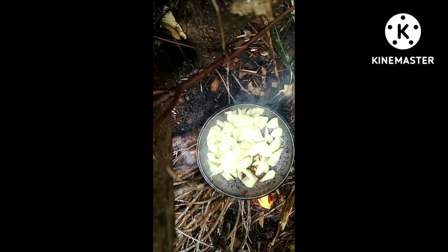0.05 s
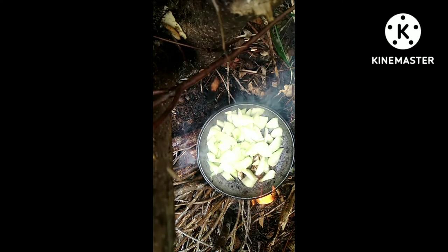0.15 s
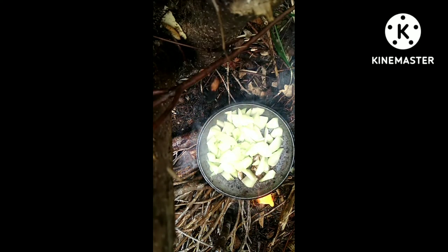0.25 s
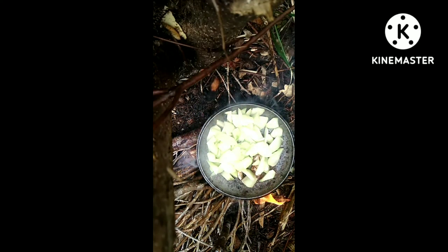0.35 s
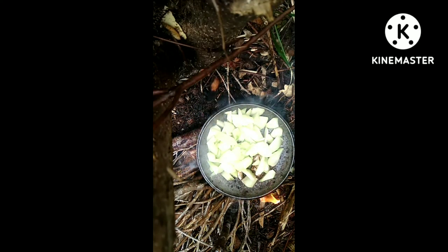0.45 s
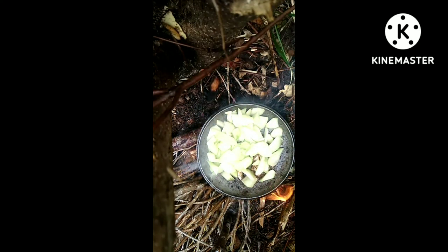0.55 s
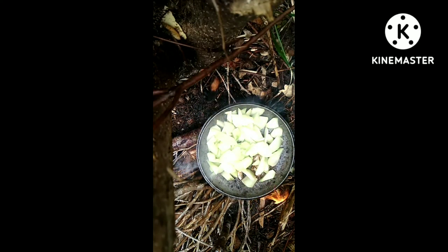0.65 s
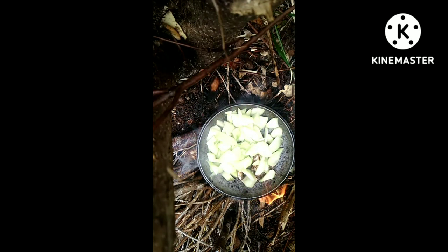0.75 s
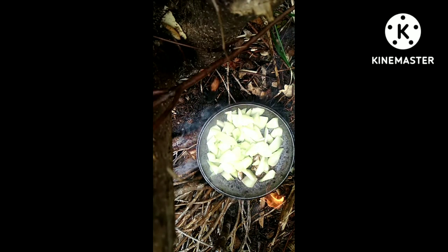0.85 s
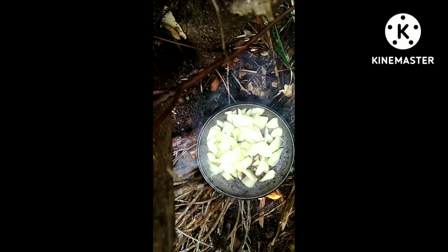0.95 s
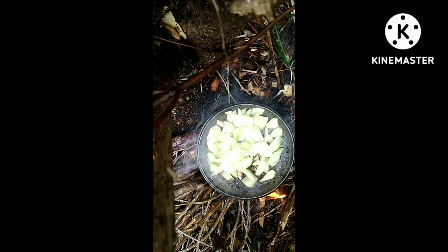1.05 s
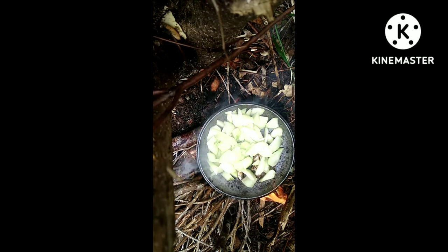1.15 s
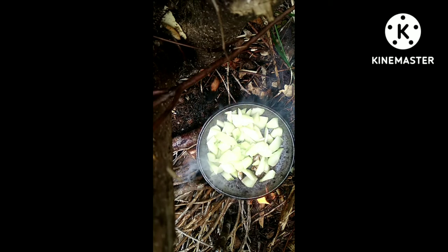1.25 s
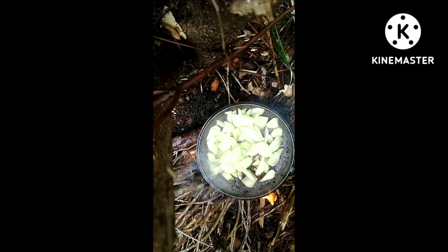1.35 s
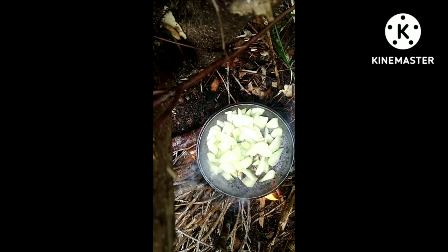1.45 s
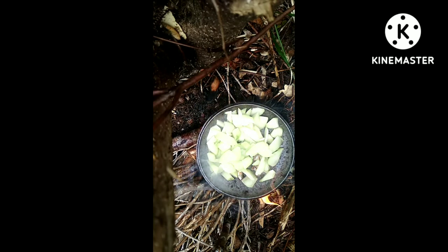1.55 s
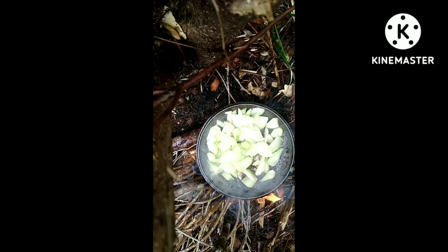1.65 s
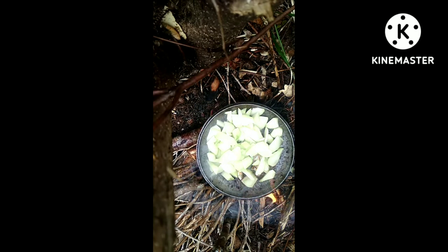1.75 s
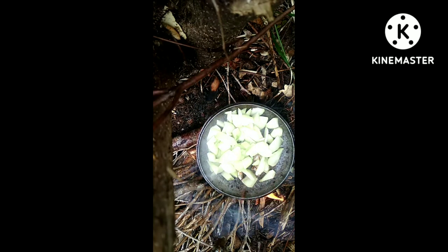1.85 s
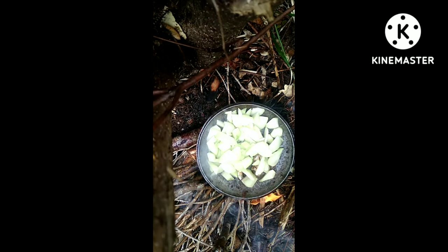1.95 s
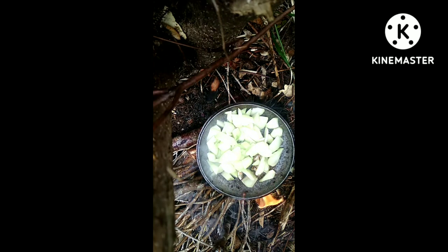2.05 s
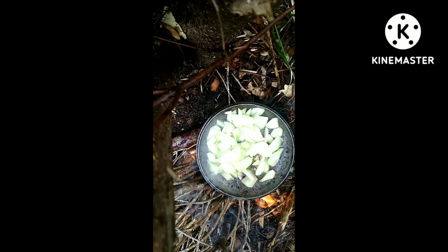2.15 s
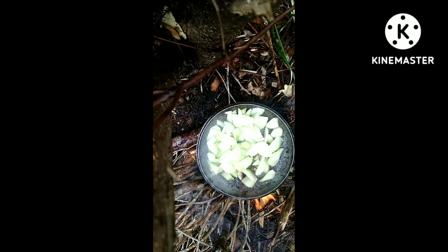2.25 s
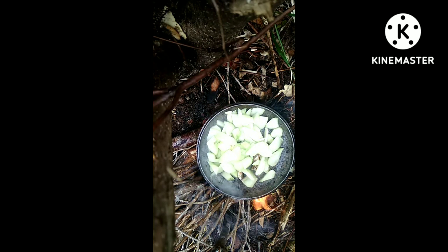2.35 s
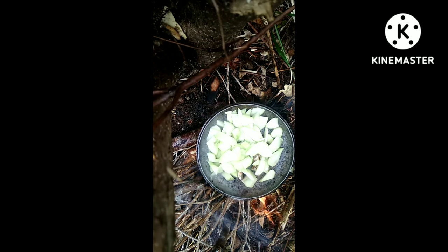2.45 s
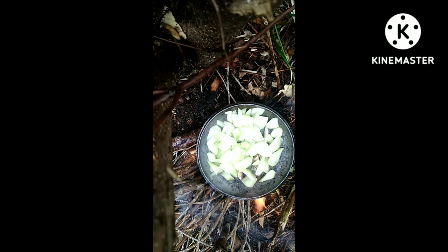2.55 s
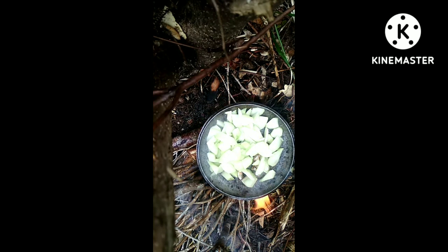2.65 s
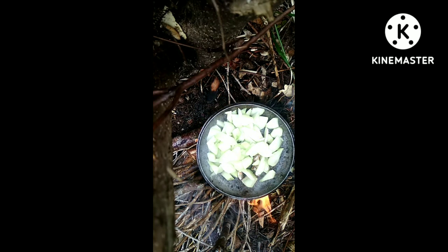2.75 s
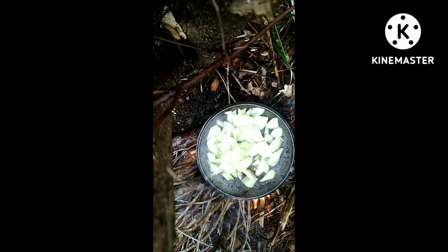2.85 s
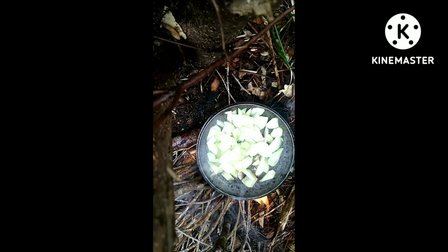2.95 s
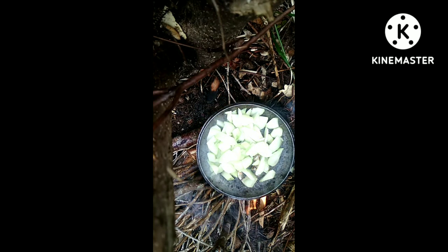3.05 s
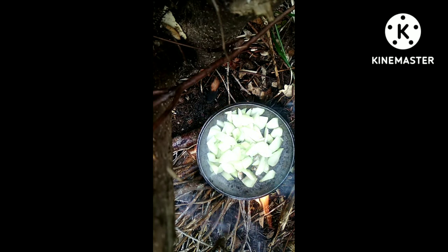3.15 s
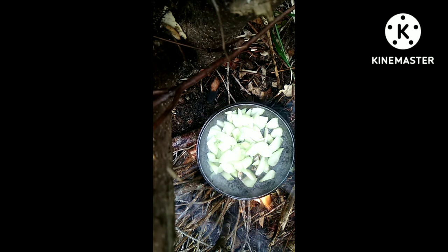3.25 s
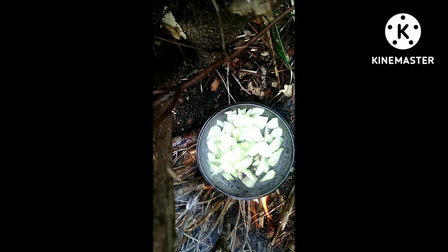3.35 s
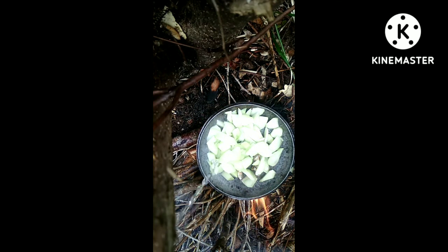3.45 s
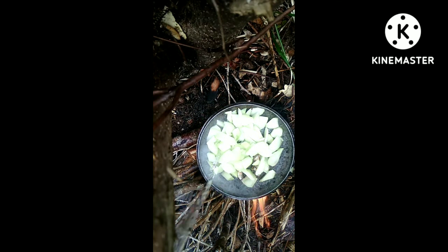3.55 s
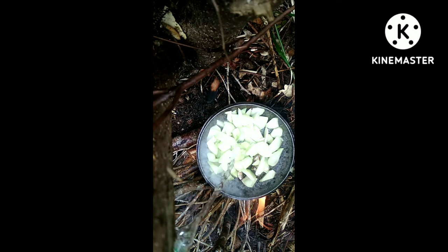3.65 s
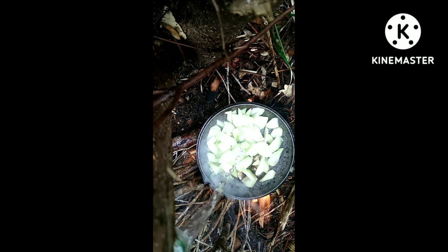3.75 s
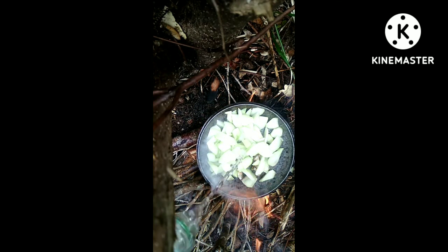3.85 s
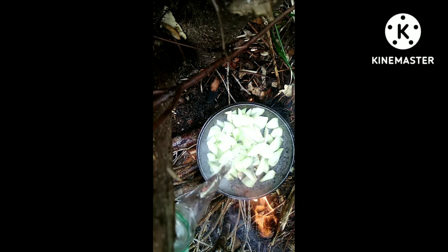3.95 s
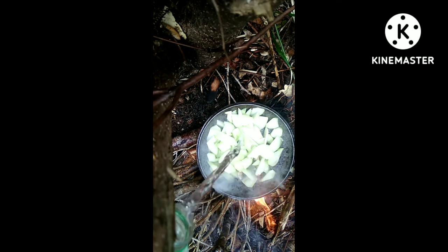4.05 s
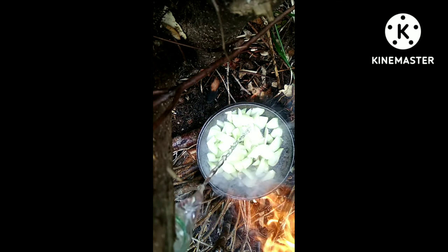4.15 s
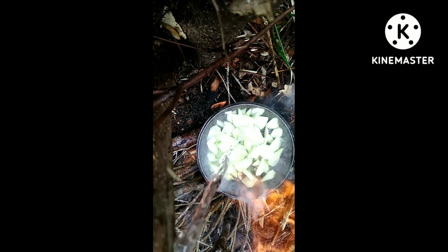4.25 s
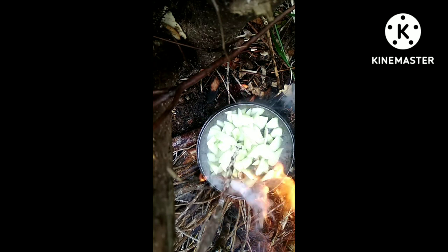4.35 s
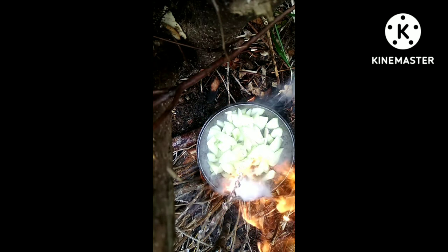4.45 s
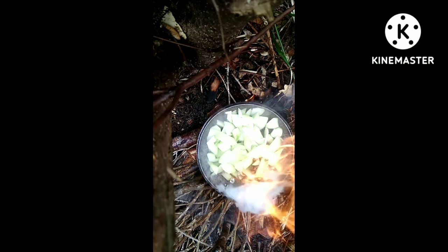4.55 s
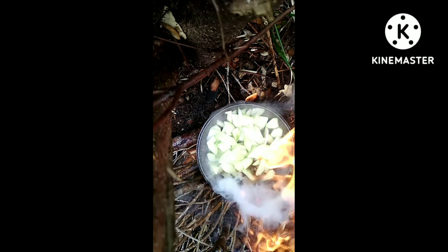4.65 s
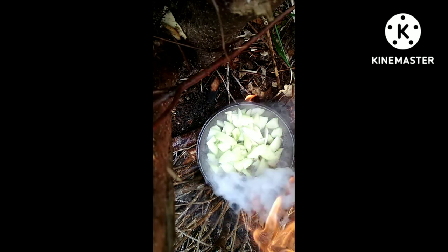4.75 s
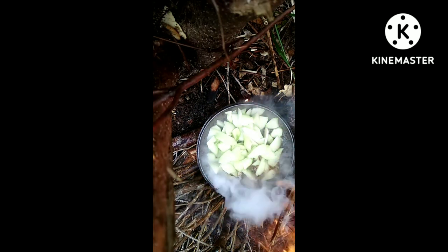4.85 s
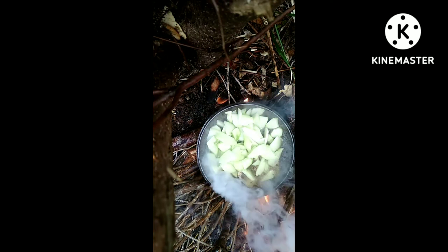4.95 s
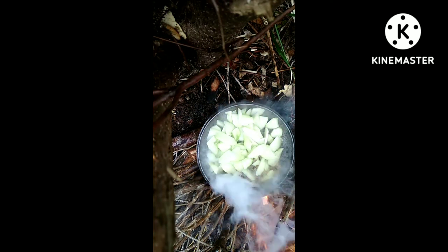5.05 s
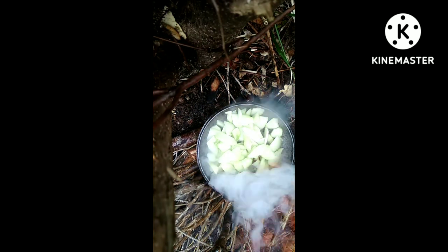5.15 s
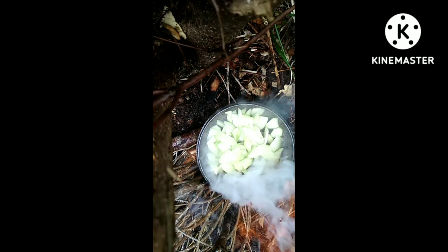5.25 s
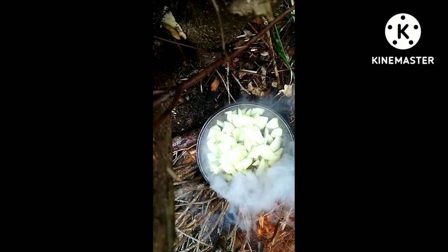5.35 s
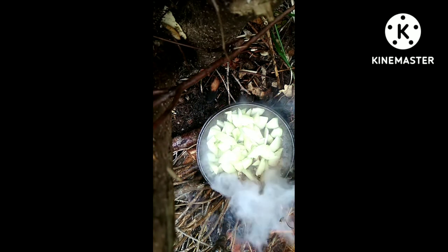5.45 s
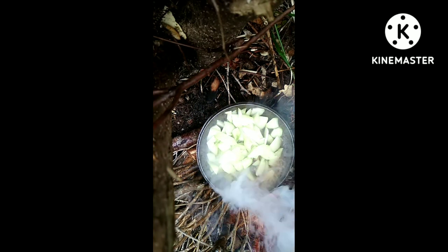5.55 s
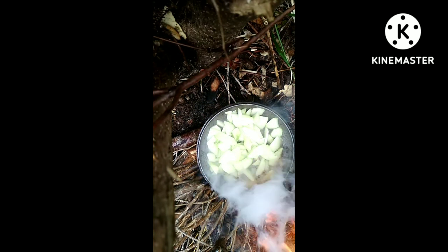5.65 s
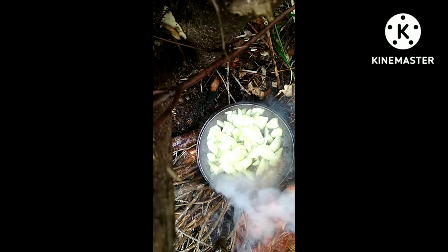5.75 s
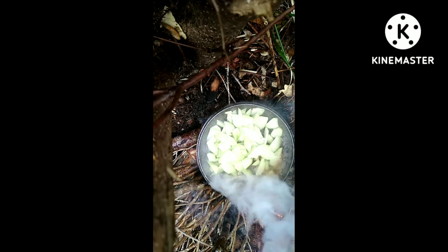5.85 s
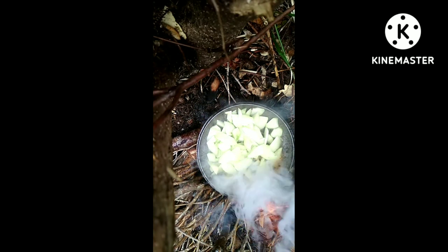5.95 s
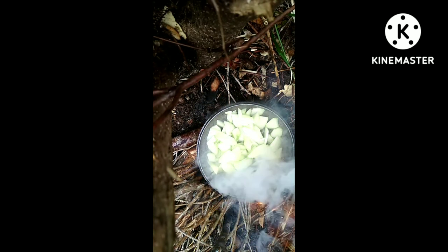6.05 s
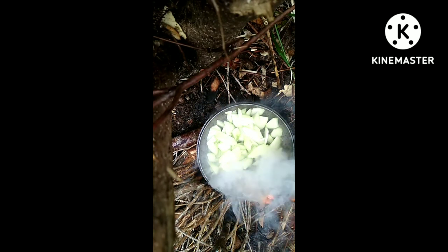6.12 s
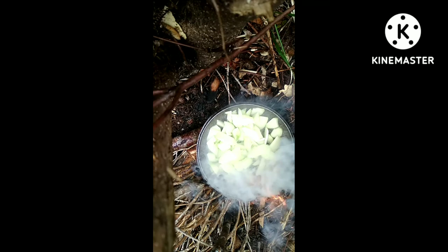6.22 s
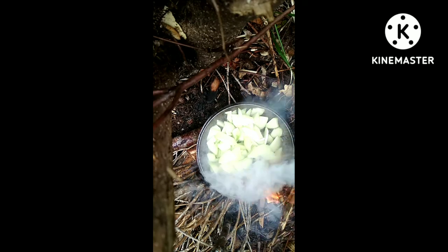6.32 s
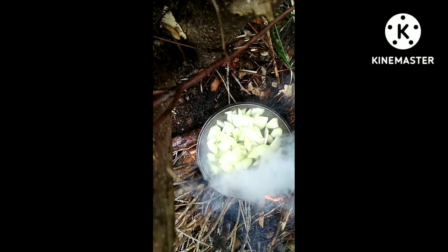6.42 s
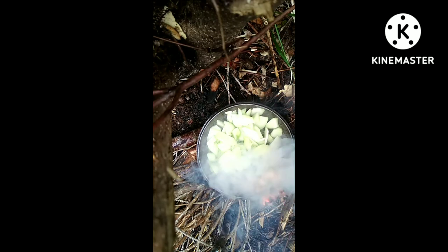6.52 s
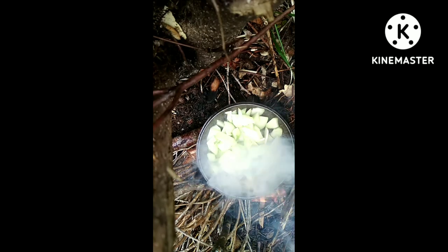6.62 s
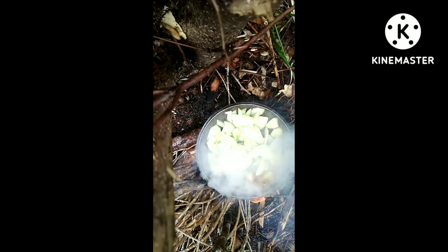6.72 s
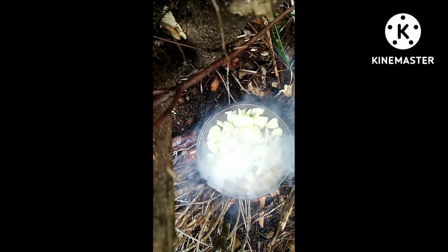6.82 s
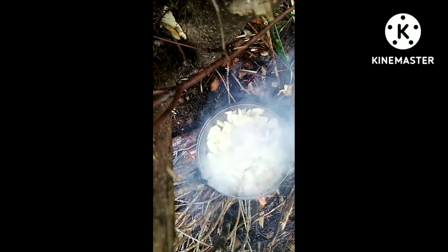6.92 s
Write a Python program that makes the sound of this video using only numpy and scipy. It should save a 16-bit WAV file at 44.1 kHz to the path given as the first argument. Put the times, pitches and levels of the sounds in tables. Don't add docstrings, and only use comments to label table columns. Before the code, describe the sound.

Outdoors, close to a pan over a twig fire, a dense bright sizzle runs throughout, fairly steady with small wavers. From 0 to 3.5 seconds fat spits in frequent sharp ticks, leaning right, over a soft simmer that slowly thickens; twigs snap drily, with clusters around 1.5 and 2.3 and a strong pop near 2.8. Faint finger rubs and casing creaks gather around 0.8 to 1.4, with slight wind buffets. A hard crack comes at 3.5 as flames begin on the right. Fuel catches around 4, swelling to a fluttering, blowing roar at about 4.5 that spreads to the centre. Heavy air flaps and a loud stick pop come near 5, more at 5.7, then scattered pops from 6.3 to 6.9 as the roar subsides, leaving sizzle. The handheld stereo sound is dry, with a slightly watery, mottled hiss.

```python
import sys
import numpy as np
from scipy import signal
from scipy.fft import rfft, irfft, dct, next_fast_len
from scipy.io import wavfile
from scipy.ndimage import uniform_filter1d

SR = 44100
rng = np.random.default_rng(int(sys.argv[2]) if len(sys.argv) > 2 else 0)


def dump(signal):
    limited = np.clip(np.atleast_2d(signal).T, -1, 1)
    pcm = np.round(limited * 32767).astype(np.int16)
    wavfile.write(sys.argv[1], SR, pcm)


def makeup_ratio(level_db):
    decades = np.asarray(level_db, float) / 20
    return 10 ** decades


N = 307811

# (time [s], level [dB])
FRYING_HEAT = [(0.0, -34.5), (0.25, -37), (0.47, -36.5), (0.62, -34.5), (0.87, -36.5), (1.59, -36),
               (2.21, -35), (3.71, -34.5), (4.33, -33.5), (6.65, -35.5), (6.98, -37.5)]
# (time [s], peak [dB], left-right [dB])
FAT_SPITS = [(0.0391, -18, -14), (0.0625, -13, -16), (0.1766, -27, 5), (0.1867, -14, -15),
             (0.2407, -19, -16), (0.2595, -17.5, -15), (0.518, -13.5, -6), (0.5492, -15.5, -20),
             (0.5668, -15, -17), (0.636, -12.5, -14), (0.6514, -17, -17), (0.6782, -13.5, -15),
             (0.7415, -26, 3), (0.7462, -21, 1), (0.7527, -25, -7), (0.7742, -19, 0), (0.8829, -21, -7),
             (0.9474, -25, -14), (0.9985, -23, -14), (1.0698, -20, -18), (1.0772, -15, -14),
             (1.0862, -12, -17), (1.1005, -21, -14), (1.1198, -20, -14), (1.1373, -18.5, -14),
             (1.1889, -17.5, -11), (1.2112, -23, -11), (1.2192, -22, -11), (1.2595, -15, -14),
             (1.33, -15, -12), (1.3575, -15.5, -15), (1.4771, -20, -13), (1.5315, -21, -6),
             (1.6917, -20, 4), (1.7188, -21, -8), (1.7288, -21.5, 0), (1.8663, -19, -3), (1.9036, -18, -16),
             (1.9232, -14, -13), (1.9812, -18, -9), (2.0272, -20, -5), (2.0854, -18, 10), (2.1095, -25, -3),
             (2.2799, -21, -7), (2.3241, -18, 1), (2.3605, -18, 0), (2.3715, -18, -14), (2.4283, -23, 12),
             (2.4424, -20, 5), (2.6026, -24, -4), (2.7921, -25, 1), (3.0619, -17, -7), (3.1125, -16, -14),
             (3.2052, -17.5, -18), (3.2263, -19, -14), (3.2547, -15, -11), (3.4189, -18, -12),
             (3.4716, -18, -13), (3.5107, -12, -4), (3.8431, -28, 2)]
# (time [s], length [s], rms level [dB], pitch [Hz], left-right [dB])
JUICE_POCKETS = [
    (0.513, 0.023, -37.5, 4870, -2),
    (1.508, 0.015, -39, 5860, -13),
    (1.622, 0.071, -36.5, 5100, -6),
    (1.687, .006, -36, 4700, -4),
    (1.709, 0.056, -39.5, 4660, -3),
    (1.904, 0.006, -32, 4600, -17),
    (1.986, 0.0044, -32.5, 4600, -4),
    (3.511, .0012, -33, 3100, -6),
    (3.5, .12, -43, 6400, -5),
    (4.93, .08, -45.5, 3780, -3.5),
]
# (time [s], level [dB])
FUEL_BURNING = [
    (3.5, -39.5),
    (3.8, -41),
    (4.05, -36.5),
    (4.3, -32.5),
    (4.5, -31.5),
    (4.95, -34.5),
    (5.25, -34),
    (6.1, -37),
    (6.98, -41.5),
]
# (time [s], length [s], rise [dB])
VAPOUR_PUFFS = [
    (3.704, .012, 4.5),
    (4.022, 0.011, 3),
    (4.087, 0.0079, 2.5),
    (4.175, 0.016, 2),
    (5.054, 0.074, 4.5),
    (5.684, 0.06, 2.5),
    (6.043, 0.022, 2.5),
    (6.348, 0.026, 3.5),
]
# (time [s], peak [dB], left-right [dB], pitch [Hz])
AIR_FLAPS = [(1.8014, -42, 18, 457), (1.9985, -40, -7, 330), (2.0105, -44, -5, 370), (2.1166, -39, -8, 312),
             (2.1434, -38, -3, 320), (2.1618, -44, -2, 260), (2.2646, -45, 14, 200),
             (2.4679, -47, -15, 170), (2.8419, -46, 3, 240), (3.0223, -44.5, 3, 300), (3.1823, -47, 4, 280),
             (3.7861, -38, -15, 370), (3.8501, -45, 2, 350), (3.8864, -33, -18, 440),
             (3.9177, -37, -2, 380), (3.9306, -31, -3, 400), (3.9859, -33, 4, 320), (3.9937, -27, 1, 490),
             (5.0343, -16, 16, 540), (5.0515, -20, 11, 490), (5.0654, -20, 0, 320), (5.0856, -23, 14, 360),
             (5.1168, -29, 9, 400), (5.3464, -22, 13, 290), (5.3547, -19, 15, 368), (5.4598, -21, -7, 510),
             (5.7839, -27, 14, 380), (6.1641, -26, -1, 280), (6.2458, -28, 4, 393), (6.3789, -32, 5, 278),
             (6.3935, -27, -9, 410), (6.4119, -27.5, -1, 530), (6.5638, -27, 6, 330),
             (6.5925, -34, -6, 390), (6.7079, -33, -10, 370), (6.7355, -30, 11, 380)]
# (time [s], peak [dB], left-right [dB], pitch [Hz], signed push [ratio])
TWIG_POPS = [(0.062, -14, -23, 1930, -0.089), (0.113, -21.5, -9, 1620, 0.28),
             (1.5308, -19.5, -10, 1270, -0.44), (1.5773, -19, -6, 1570, -0.46),
             (1.628, -15, -4, 2600, -0.065), (1.646, -24, -3, 1300, 0.8), (1.8965, -24, -11, 1600, -0.058),
             (1.9802, -18, -11, 2220, -0.2), (2.2511, -21, 16, 1010, 1.92), (2.3176, -18, -6, 2040, -0.12),
             (2.3912, -21, -12, 1870, -0.076), (2.436, -20.5, -31, 920, 1), (2.572, -26, -4, 1900, -0.38),
             (2.5768, -15, -10, 1840, 0.055), (2.8248, -11, -2.5, 1470, 0.66),
             (2.876, -24.5, -21, 1180, 1.69), (2.8826, -20.5, -27, 810, 1.6),
             (3.0683, -20, -6, 1480, -0.15), (3.106, -26, 2, 1890, -0.52), (3.1206, -17.5, -10, 1910, 0.1),
             (3.4416, -24, -3, 1600, -0.019), (3.4737, -16.5, -3, 1520, 0.12),
             (3.537, -22.5, -4, 1000, 0.34), (3.5105, -9.5, -4, 1550, -0.19),
             (3.705, -17.5, -3, 1180, 0.54)]
# (time [s], peak [dB], left-right [dB], pitch [Hz], signed push [ratio])
STICK_POPS = [(4.0903, -12.5, -18, 1270, 1.1), (4.2855, -22, 6, 940, 0.95), (4.908, -13, 16, 1180, 1.4),
              (5.0173, -7, 21, 970, 0.21), (5.663, -8, -11, 950, 0.67), (5.6986, -13, -16, 970, 1.5),
              (6.3424, -15, 4, 1090, -0.68), (6.413, -19, -13, 1210, -0.58), (6.6138, -15.5, 3, 1020, 0.84),
              (6.7706, -11, -8, 1140, -0.066), (6.9306, -15, -9, 1270, -0.11)]
# (time [s], peak [dB], left-right [dB], pitch [Hz])
BARK_TICKS = [(0.0862, -29, -9, 1710), (0.3473, -31, -12, 1560), (0.3538, -41, 0, 1930),
              (0.3635, -34, -14, 2100), (0.5492, -29, -10, 1520), (0.6457, -31, -13, 2000),
              (0.8069, -40, 4, 1410), (0.8261, -37, 4, 1670), (0.8728, -40, 4, 1430),
              (0.9026, -40, -6, 1350), (0.9751, -41, -8, 1330), (1.0454, -37, -14, 2000),
              (1.1203, -45, -1, 1560), (1.1373, -38, -16, 1720), (1.3188, -37, -2, 2070),
              (1.5034, -33, -9, 1980), (1.5383, -33, -9, 2080), (1.7183, -38, -6, 2420),
              (1.8665, -34, -11, 1860), (2.0267, -34, 1, 2130), (2.0398, -35, -14, 2010),
              (2.0638, -34, -3, 2330), (2.1202, -27, -13, 1710), (2.2298, -31, -8, 2240),
              (2.2659, -24, -9, 2240), (2.3263, -27, -10, 1460), (2.4551, -32, -4, 1760),
              (2.7709, -30, -14, 1660), (2.8477, -33, 4, 1900), (2.9207, -32, -6, 2090),
              (2.9506, -35, -12, 1800), (3.2314, -31, -6, 1920), (3.2548, -30, 7, 1690),
              (3.2811, -28, -7, 1880), (3.4413, -32, -3, 1590), (3.4832, -35, -3, 1510),
              (3.4998, -30, -1, 1630), (5.3387, -23, 7, 1340), (5.6985, -22, -14, 1430),
              (5.7338, -21, -14, 1360)]
# (time [s], peak [dB], left-right [dB], pitch [Hz])
HOLLOW_KNOCKS = [
    (1.022, -45, -3, 620),
    (1.05, -53, 1, 443),
    (2.119, -36.5, -2, 347),
    (3.368, -51, 0, 400),
    (3.6, -46, 0, 320),
]
# (time [s], length [s], level [dB])
FINGER_SHIFTS = [
    (.2, 0.26, -54),
    (.88, 0.096, -51),
    (1.058, 0.1, -52),
    (1.233, .03, -58),
    (1.4, 0.092, -50),
    (1.566, 0.11, -54.5),
    (2.093, 0.054, -57.5),
    (3.53, 0.081, -54.5),
]
# (time [s], peak [dB], left-right [dB], pitch [Hz])
CASING_CREAKS = [(0.1134, -41, -1, 340), (0.2776, -39, -5, 550), (0.2933, -44, -4, 490),
                 (0.4214, -40, -1, 310), (0.7905, -40, -8, 367), (0.8057, -32.5, -1, 330),
                 (0.826, -40, 7, 460), (0.871, -29, -4, 387), (0.8873, -36, -3, 567), (0.905, -30, 8, 476),
                 (0.9354, -34, -2, 478), (0.9612, -35, 14, 430), (0.9754, -35, -12, 640),
                 (1.003, -34, -1, 590), (1.028, -41, -6, 540), (1.104, -34.5, 2, 577),
                 (1.139, -42, -1, 410), (1.3182, -35.5, 1, 360), (1.3307, -41, -10, 500),
                 (1.357, -35.5, 3, 300), (1.4155, -37, -2, 430), (1.47, -41, -3, 370),
                 (2.122, -39, -1, 520), (1.21, -48, 0, 380), (.8116, -35, -1, 296), (.88, -35, -3, 350),
                 (1.112, -38, -4, 500), (.636, -43, -7, 402), (1.5345, -37, -2, 350),
                 (2.8317, -35, -1, 347)]
# (time [s], length [s], left-right [dB])
HAND_TURNS = [
    (0.228, 0.067, -4),
    (0.614, 0.21, -2),
    (0.806, 0.099, 1),
    (1.02, 0.11, -4.5),
    (5.072, 0.067, 3.5),
    (6.836, 0.059, 2),
]
# (time [s], length [s], level [dB], left-right [dB])
WIND_GUSTS = [(.1, 0.17, -62, 1), (0.85, 0.06, -50, 0), (1.08, 0.069, -49, 0), (1.38, 0.068, -51, 1),
              (1.557, 0.044, -56, 3), (1.827, 0.044, -50, -7), (1.993, .04, -58, 22),
              (2.277, .1, -51.5, 12), (2.395, 0.028, -51, -18), (2.433, 0.018, -41, 7),
              (2.471, 0.012, -40, -20), (2.65, 0.14, -47.5, -2), (2.9, 0.16, -51, 0),
              (3.098, 0.055, -49.5, 3), (3.452, 0.081, -43.5, -7.5), (3.69, 0.04, -46, -12.5),
              (4.55, 0.1, -47, -6), (5.3, 0.2, -45, -5)]

# (frequency [Hz], density [dB per Hz])
FIZZ_SPECTRUM = [(2500, -5.5), (3300, -8), (4500, -3.5), (6000, -2.5), (8000, -0.5), (11000, 0), (15500, 1)]
# (frequency [Hz], density [dB per Hz])
SIMMER_SPECTRUM = [(220, -22), (400, -22), (600, -17), (1000, -4), (1500, -1), (2200, 1), (3200, -8.5),
                   (4500, -34.5)]
# (frequency [Hz], density [dB per Hz])
FLAME_SPECTRUM = [(400, -14), (700, -2), (1200, 1), (1800, -3), (2300, -9), (2700, -15.5), (3200, -20),
                  (4000, -29.5)]
# (frequency [Hz], density [dB per Hz])
ROAR_SPECTRUM = [(60, -12), (130, 2), (220, -1), (330, -4), (550, -4), (900, -7.5)]
# (frequency [Hz], density [dB per Hz])
RUB_SPECTRUM = [(80, -29), (150, 4), (300, -1.5), (550, -7), (900, -3.5), (1400, -19)]
# (frequency [Hz], density [dB per Hz])
BUFFET_SPECTRUM = [(20, -8), (40, -6.5), (70, 1), (110, 1), (170, -10.5), (260, -58)]

# (frequency [Hz], left-right [dB])
PORT_SHADE = [(60, 0.5), (120, -1.5), (240, -2.5), (480, -0.5), (950, -5.5), (1890, -5.5), (3770, -4),
              (7520, -8), (15000, 3.5)]
# (frequency [Hz], correlation [ratio])
PORT_LIKENESS = [(60, .6), (130, .5), (300, .1), (650, .34), (1030, .58), (1700, .36), (2600, .33),
                 (3400, .06), (15000, .05)]
# (frequency [Hz], phase the left port trails [rad])
LEFT_PORT_LAG = [(0, 0), (500, .9), (1000, 1.5), (1400, 1.5), (1800, .7), (2600, 1.2), (3400, .2),
                 (5500, 1.5), (8000, 0)]
# (frequency [Hz], left or sum step [dB], right or difference
# step [dB])
PATCH_STEP = [(1200, -120, -120), (1700, -18, -18), (2300, -7, -7), (2800, 1, 0), (3400, 5.5, 3),
              (4500, 4.5, 1.5), (7000, 4.5, -4), (8500, -1, -3), (10000, .2, .2), (15500, -.3, -.3)]

FULL_FLAME_DB = -32


def frying():
    return fizz() + simmer() + spits() + seething()


def fizz():
    heat_db, = in_time(FRYING_HEAT)
    bubbles = texture(FIZZ_SPECTRUM, per_s=10500, spread_db=0.7, throb_hz=11.5,
                      shared_db=0.1, own_db=0.32, alike_plus=0.01)
    return makeup_ratio(heat_db + 1.0) * sides(sway_db() + 0.19) * bubbles


def simmer():
    heat_db, = in_time(FRYING_HEAT)
    start_db, rise_db_per_s, top_db, follows_heat = -52.5, 1.5, -43, 0.18
    juice_db = np.minimum(start_db + rise_db_per_s * np.arange(N) / SR, top_db)
    juice_db = juice_db + follows_heat * (heat_db - heat_db.mean())
    bubbles = texture(SIMMER_SPECTRUM, per_s=2500, spread_db=1.5, throb_hz=28.0,
                      shared_db=0.6, own_db=0.7, alike_plus=0.058)
    return makeup_ratio(juice_db) * bubbles


def spits():
    out, t = np.zeros((2, N)), np.arange(256) / SR
    rise_s, decay_s = 0.000067, 0.0008
    envelope = np.minimum(t / rise_s, 1) * np.exp(-t / decay_s)
    bright = signal.butter(2, [2200, 12500], "band", fs=SR, output="sos")
    for s, peak_db, pan_db in FAT_SPITS:
        burst = signal.sosfilt(bright, rng.standard_normal(len(t)) * envelope)
        add(out, s, peak_db - 2.0, pan_db, burst / abs(burst).max(), lead=abs(burst).argmax())
    return out


def seething():
    out, t = np.zeros((2, N)), np.arange(-6000, 6000) / SR
    for s, length, level_db, hz, pan_db in JUICE_POCKETS:
        crackle = rng.standard_normal(len(t)) * rng.exponential(1, len(t)) ** 1.6
        around = signal.butter(2, [hz * 0.86, hz * 1.22], "band", fs=SR, output="sos")
        swell = np.exp(-(t / length) ** 2)
        add(out, s, level_db, pan_db, rms_one(signal.sosfilt(around, crackle)) * swell, lead=6000)
    return out


def flare():
    since_s = np.maximum(np.arange(N) / SR - 3.5, 0)
    pan_db = -2.5 * np.exp(-since_s / 0.72) + 2.1 * sway_db() + 0.06
    full = ramp(3.48, 0.83)
    return ramp(3.45, 0.35) * sides(pan_db) * (flame(full) + roar(full))


def flame(full):
    blow = texture(FLAME_SPECTRUM, per_s=2500, spread_db=-1.0, throb_hz=46.0,
                   shared_db=-0.84, own_db=-0.86, alike_plus=0.063)
    hiss = signal.sosfilt(signal.butter(2, 1800, "high", fs=SR, output="sos"), blow)
    catch_s, catch_db, fade_s = 3.95, 4.0, 0.5
    catching = makeup_ratio(catch_db) * np.exp(-np.maximum(np.arange(N) / SR - catch_s, 0) / fade_s)
    return makeup_ratio(flame_level_db() + 1.48) * (full * blow + catching * hiss)


def roar(full):
    full_db, per_flame_db, lag_s = -34.5, 1.45, 0.06
    level_db = full_db + per_flame_db * (flame_level_db(lag_s) - FULL_FLAME_DB)
    lumps = texture(ROAR_SPECTRUM, per_s=700, spread_db=1.5, throb_hz=17.0,
                    shared_db=0.1, own_db=0.5, alike_plus=0.01)
    return makeup_ratio(level_db) * np.sqrt(full + 0.075) * lumps


def flame_level_db(lag_s=0):
    s, db = np.transpose(FUEL_BURNING)
    burning_db = np.interp(np.arange(N) / SR - lag_s, s, db)
    return burning_db + swells(VAPOUR_PUFFS, np.array(VAPOUR_PUFFS)[:, 2])


def flaps():
    return thuds(AIR_FLAPS, trim_db=-3.0, decay_s=0.0017)


def twigs():
    out, t = np.zeros((2, N)), np.arange(-64, 192) / SR
    ticks = [(s, peak_db + 7.5, pan_db, hz, 0.091 * (-1) ** k)
             for k, (s, peak_db, pan_db, hz) in enumerate(BARK_TICKS)]
    for s, peak_db, pan_db, hz, push in TWIG_POPS + STICK_POPS + ticks:
        cycles = t * hz
        ring = np.cos(2 * np.pi * cycles) * np.exp(-(cycles / np.where(t < 0, 0.55, 0.8)) ** 2)
        shove = np.exp(-(cycles / 0.25) ** 2)
        share = np.clip(0.7 * abs(push), 0, 1)
        burst = np.sign(push) * ((1 - share) * ring + 2.0 * share * shove)
        add(out, s, peak_db - 6.5, pan_db, burst, lead=64)
    return out


def bloops():
    out, t = np.zeros((2, N)), np.arange(4096) / SR
    rise_s, decay_s = 0.002, 0.0096
    envelope = (1 - np.exp(-t / rise_s)) * np.exp(-t / decay_s)
    for s, peak_db, pan_db, hz in HOLLOW_KNOCKS:
        note = np.sin(2 * np.pi * hz * t) * envelope
        add(out, s, peak_db, pan_db, note / note.max(), lead=0)
    return out


def fingers():
    still_db = -61
    shifts = swells(FINGER_SHIFTS, makeup_ratio(2 * np.array(FINGER_SHIFTS)[:, 2]), order=6)
    rub = texture(RUB_SPECTRUM, per_s=560, spread_db=1.0, throb_hz=18.0,
                  shared_db=0.46, own_db=1.9, alike_plus=0.52)
    creaks = thuds(CASING_CREAKS, trim_db=-0.4, decay_s=0.00175)
    return np.sqrt(makeup_ratio(2 * still_db) + shifts) * rub + creaks


def draught():
    calm_db, freshen_db_per_s, suction_db, suction_per_flame_db = -57.5, 0.5, -47.5, 0.86
    steady_db = calm_db + freshen_db_per_s * np.minimum(np.arange(N) / SR, 3.0)
    sucked_db = suction_db + suction_per_flame_db * (flame_level_db() - FULL_FLAME_DB)
    gust_gains = np.array([makeup_ratio(db) * sides(pan_db) for s, length, db, pan_db in WIND_GUSTS]).T
    power = makeup_ratio(2 * steady_db) + ramp(3.7, 0.22) * makeup_ratio(2 * sucked_db) + swells(WIND_GUSTS, gust_gains ** 2)
    lumps = texture(BUFFET_SPECTRUM, per_s=300, spread_db=2.5, throb_hz=15.0,
                    shared_db=0.56, own_db=1.46, alike_plus=-0.3)
    return np.sqrt(power) * lumps


def sway_db():
    return swells(HAND_TURNS, np.array(HAND_TURNS)[:, 2])


def thuds(rows, trim_db, decay_s):
    out, t = np.zeros((2, N)), np.arange(1024) / SR
    for s, peak_db, pan_db, hz in rows:
        body = signal.butter(1, [hz * 0.4, hz * 1.5], "band", fs=SR, output="sos")
        blow = rng.standard_normal(len(t)) * t * np.exp(-t / decay_s)
        thud = signal.sosfilt(body, signal.sosfilt(body, blow))
        add(out, s, peak_db + trim_db, pan_db, thud / abs(thud).max(), lead=abs(thud).argmax())
    return out


def texture(spectrum, per_s, spread_db, throb_hz, shared_db, own_db, alike_plus):
    out, together = 0, drift(throb_hz) + 1.2 * drift(throb_hz / 5)
    trains = [grains(per_s, spread_db) for turn in range(2)]
    lowest, highest = spectrum[0][0], spectrum[-1][0]
    bands = round(2.6 * np.log2(highest / lowest))
    edges = np.geomspace(lowest, highest * 1.03, bands + 1)
    for k, (low, high) in enumerate(zip(edges, edges[1:])):
        band = signal.butter(2, [low, high], "band", fs=SR, output="sos")
        mid, side = signal.sosfilt(band, trains[k % 2])
        hz = np.sqrt(low * high)
        alike = np.clip(at_hz(PORT_LIKENESS, hz) + alike_plus, 0, 1)
        gain = makeup_ratio(at_hz(spectrum, hz) + shared_db * together + own_db * drift(throb_hz))
        gain = np.interp(np.arange(N) / 20, np.arange(len(gain)), gain)
        pair = np.sqrt(1 + alike) * mid + np.sqrt(1 - alike) * side * [[1], [-1]]
        out = out + gain * pair * sides(at_hz(PORT_SHADE, hz))[:, None]
    return out / np.sqrt(np.mean(out.mean(axis=0) ** 2))


def grains(per_s, spread_db):
    out, count = np.zeros(2 * N), round(2 * N * per_s / SR)
    at = rng.integers(0, 2 * N, count)
    size_db = spread_db * np.minimum(rng.exponential(1, count), 4)
    out[at] = makeup_ratio(size_db) * rng.standard_normal(count)
    return rms_one(out.reshape(2, N))


def drift(rate_hz):
    r = np.exp(-40 * np.pi * rate_hz / SR)
    noise = rng.standard_normal(N // 20 + 3002)
    return rms_one(signal.lfilter([1], [1, -2 * r, r * r], noise)[3000:])


def swells(rows, heights, order=2):
    t = np.arange(0, N + 32, 32) / SR
    bells = np.array([np.exp(-((t - row[0]) / row[1]) ** order) for row in rows])
    return np.repeat(heights @ bells, 32, axis=-1)[..., :N]


def ramp(start_s, length_s):
    return np.clip((np.arange(N) / SR - start_s) / length_s, 0, 1)


def add(out, s, peak_db, pan_db, shape, lead):
    at = round(s * SR) - lead
    gains = sides(pan_db) * makeup_ratio(peak_db - abs(pan_db) / 2)
    out[:, at:at + len(shape)] += gains[:, None] * shape


def sides(pan_db):
    return makeup_ratio(np.array([pan_db / 2, -pan_db / 2]))


def rms_one(x):
    return x / np.sqrt(np.mean(x ** 2) + 1e-20)


def in_time(rows):
    s, *columns = np.transpose(rows)
    return [np.interp(np.arange(N) / SR, s, c) for c in columns]


def at_hz(points, hz):
    table_hz, value = np.transpose(points)
    return np.interp(np.log(hz), np.log(table_hz), value)


def scene():
    return frying() + flare() + flaps() + twigs() + bloops() + fingers() + draught()


def round_casing(x):
    size = next_fast_len(N + 512)
    lag = np.interp(np.arange(size // 2 + 1) * SR / size, *np.transpose(LEFT_PORT_LAG))
    left = irfft(rfft(x[0], size) * np.exp(-1j * lag), size)[:N]
    return np.array([left, x[1]])


def gate(x):
    hop, start, gate_db = 1024, 910, -0.7
    window = np.sin(np.pi * (np.arange(2 * hop) + 0.5) / (2 * hop))
    padded = np.pad(x, [(0, 0), (2 * hop - start, 3 * hop)])
    blocks = padded[:, :(N // hop + 4) * hop].reshape(2, -1, hop)
    lapped = np.concatenate([blocks[:, :-1], blocks[:, 1:]], axis=2) * window
    a, b, c, d = np.split(lapped, 4, axis=2)
    folded = np.concatenate([-c[..., ::-1] - d, a - b[..., ::-1]], axis=2)
    hz = (np.arange(hop) + 0.5) * SR / 2 / hop
    z = sum_difference(dct(folded, type=4, norm="ortho"), hz)
    step_db = np.array([at_hz(np.array(PATCH_STEP)[:, [0, port]], hz) for port in (1, 2)])[:, None]
    patch = uniform_filter1d(uniform_filter1d(z ** 2, size=9, axis=2), size=3, axis=1)
    local = uniform_filter1d(uniform_filter1d(z ** 2, size=30, axis=2), size=5, axis=1) + 1e-20
    kept = patch > local * makeup_ratio(2 * gate_db + 0.3 * step_db)
    step = np.sqrt(abs(local)) * makeup_ratio(step_db)
    rounded = np.floor(abs(z / step) ** 0.75 + 0.4) ** (4 / 3) * step
    z = sum_difference(kept * np.sign(z) * rounded, hz)
    u, v = np.split(dct(z, type=4, norm="ortho"), 2, axis=2)
    frames = np.concatenate([v, -v[..., ::-1], -u[..., ::-1], -u], axis=2) * window
    out = frames[:, 1:, :hop] + frames[:, :-1, hop:]
    return out.reshape(2, -1)[:, hop - start:][:, :N]


def sum_difference(z, hz):
    return np.where(hz > 8800, np.array([z[0] + z[1], z[0] - z[1]]) / np.sqrt(2), z)


def roll_off(x):
    return signal.sosfilt(signal.butter(12, 16840, fs=SR, output="sos"), x)


def record(dry):
    top_cut = signal.ellip(12, 0.3, 75, 15520, fs=SR, output="sos")
    mix = gate(signal.sosfilt(top_cut, round_casing(dry)))
    return roll_off(mix)


dry = scene()
out = record(dry)
dump(out)
```